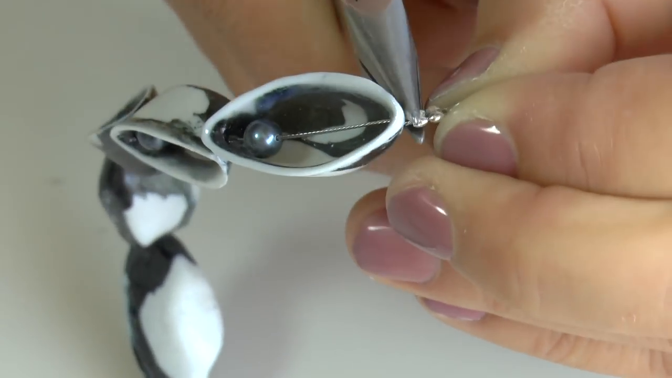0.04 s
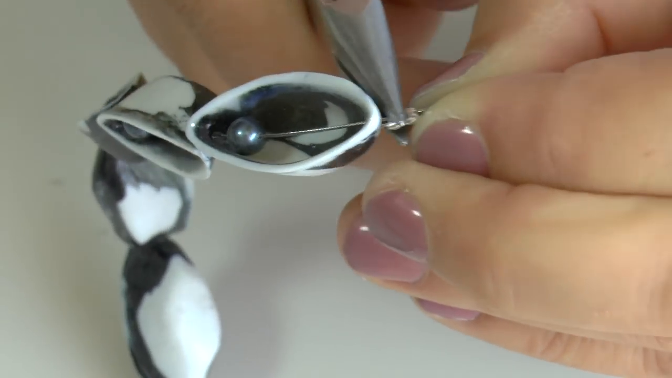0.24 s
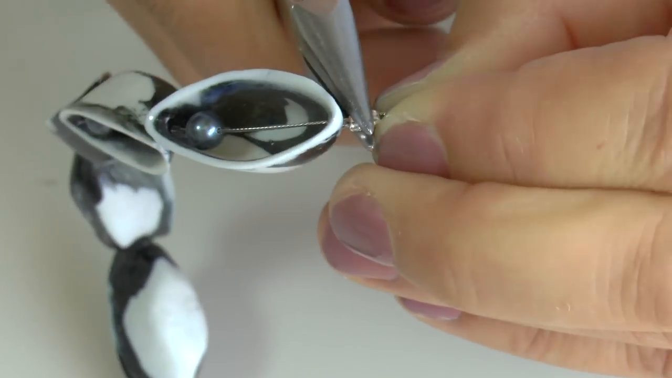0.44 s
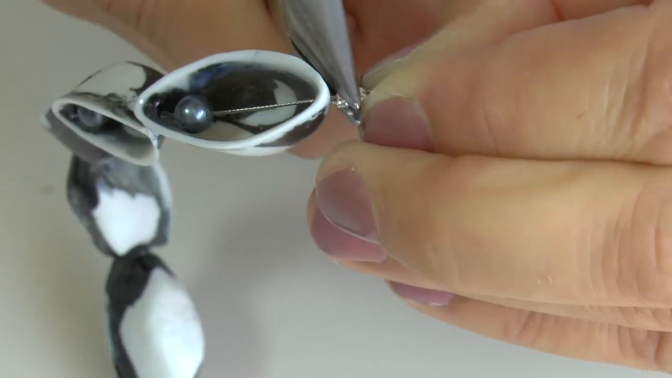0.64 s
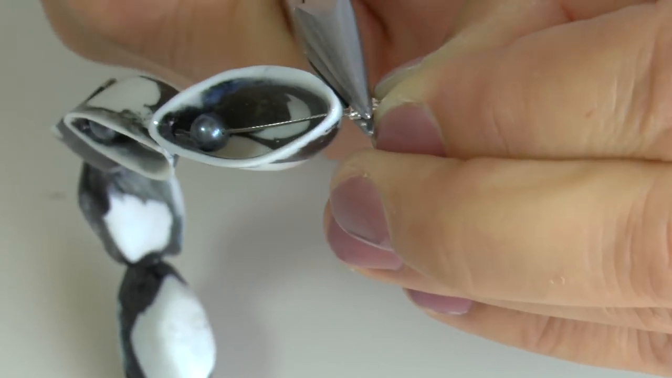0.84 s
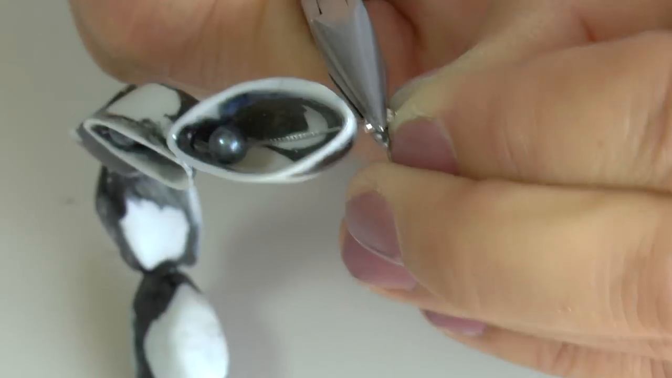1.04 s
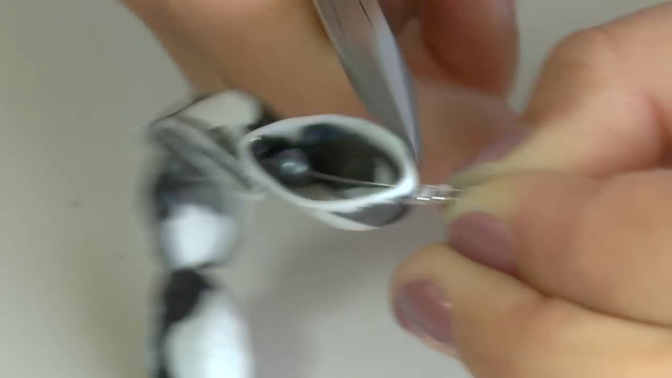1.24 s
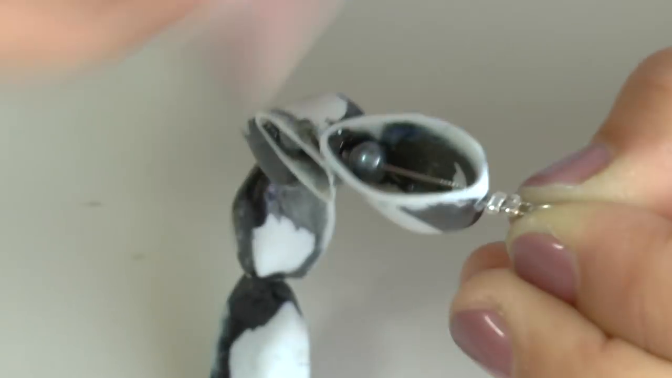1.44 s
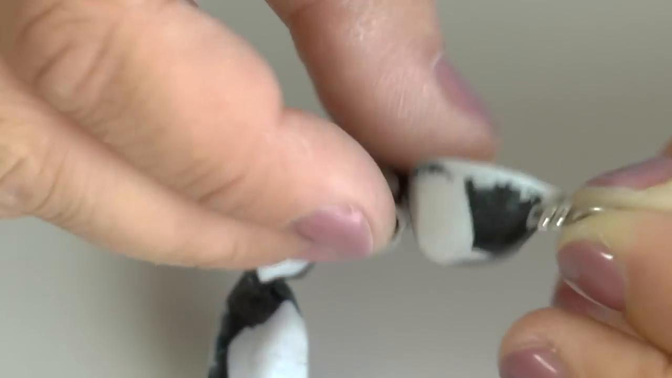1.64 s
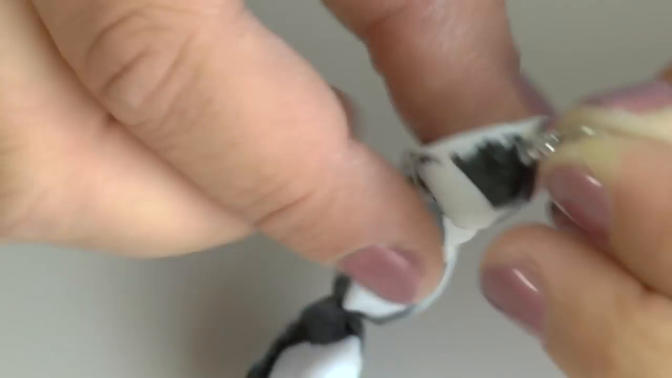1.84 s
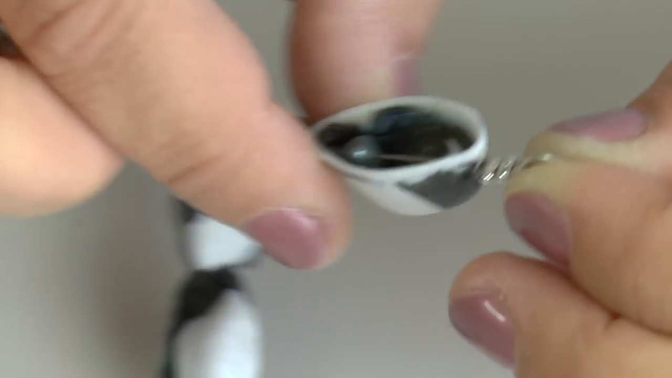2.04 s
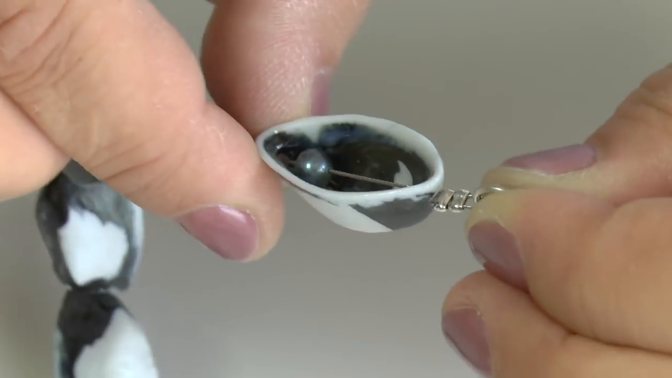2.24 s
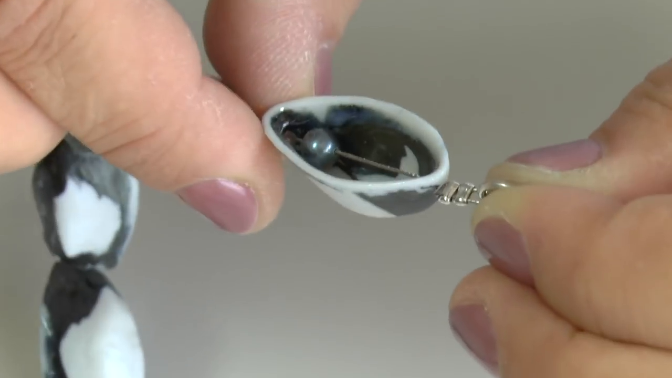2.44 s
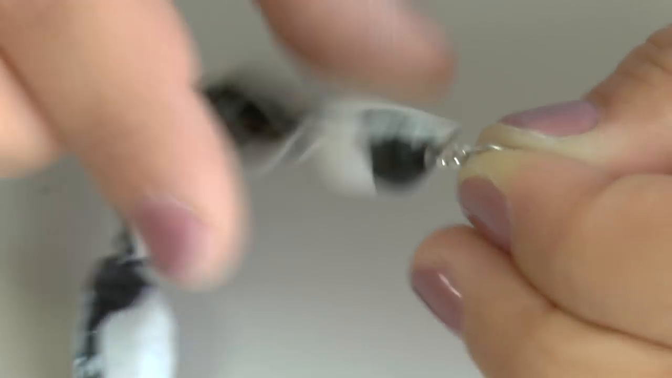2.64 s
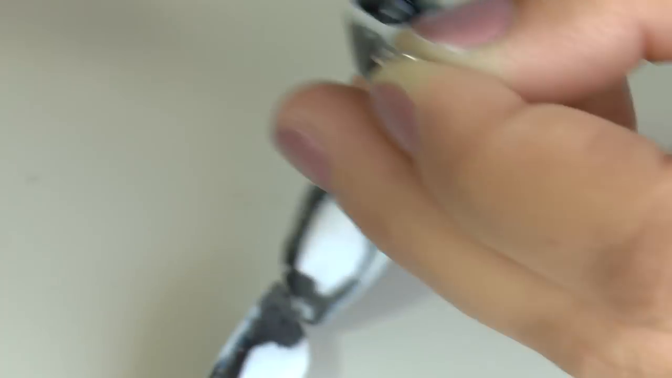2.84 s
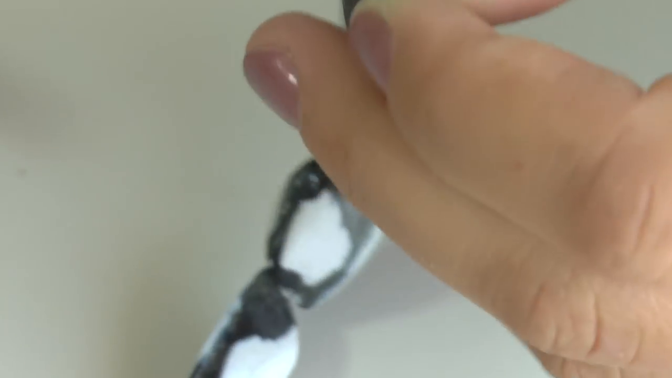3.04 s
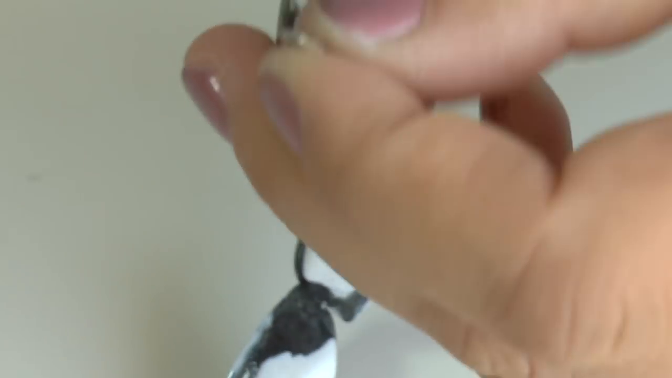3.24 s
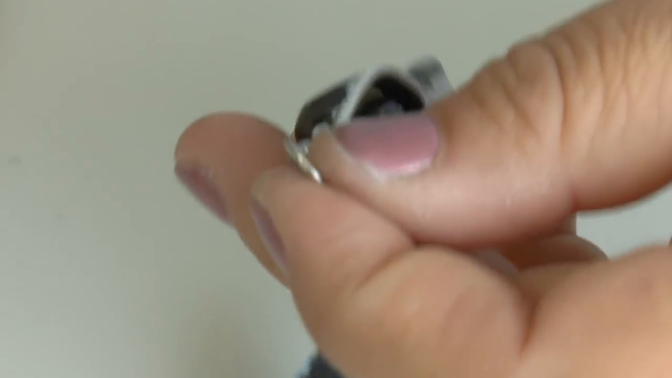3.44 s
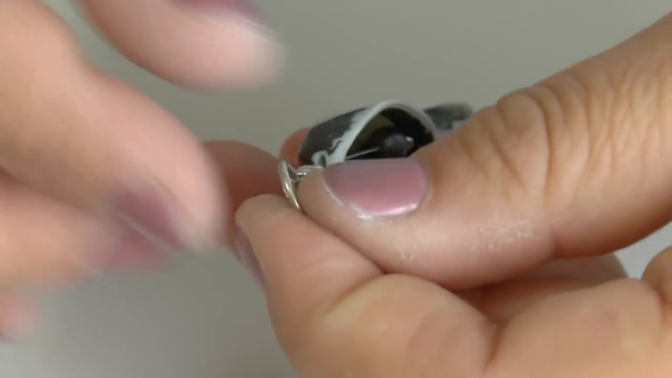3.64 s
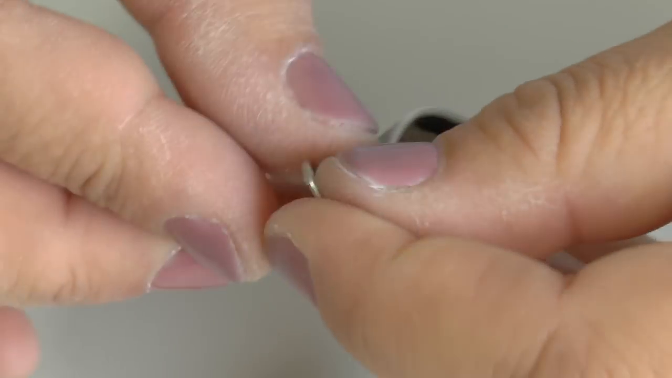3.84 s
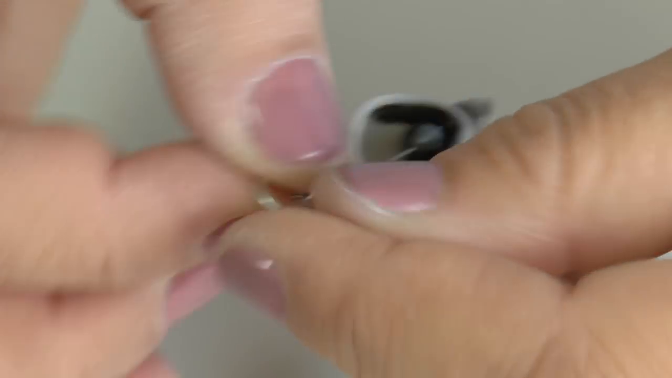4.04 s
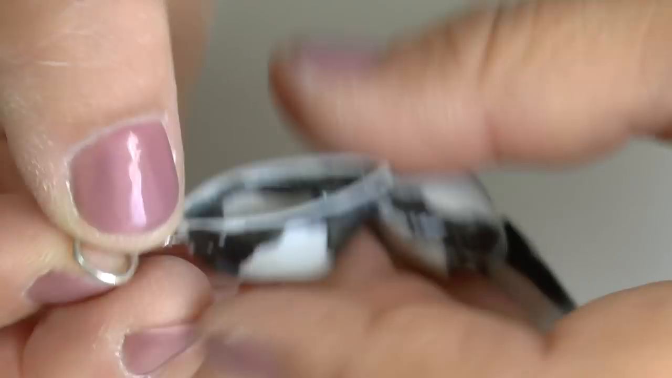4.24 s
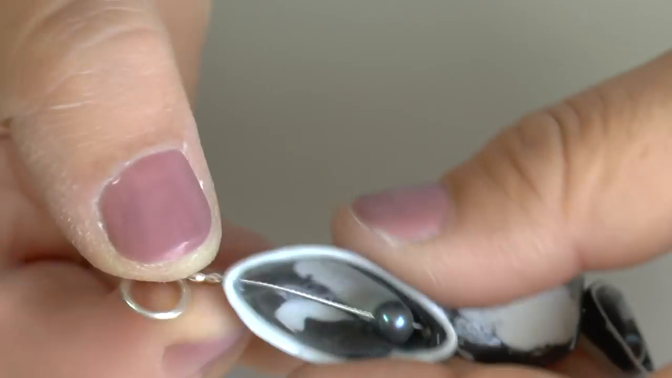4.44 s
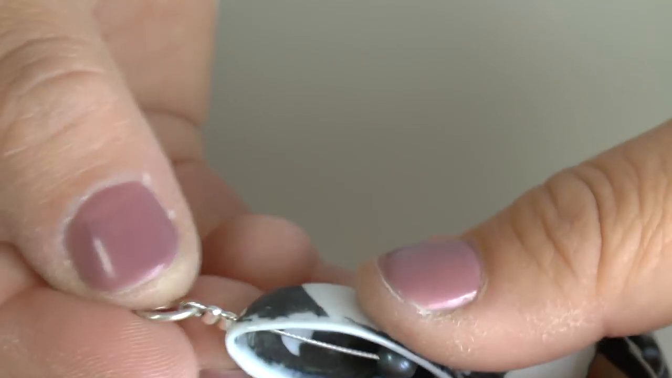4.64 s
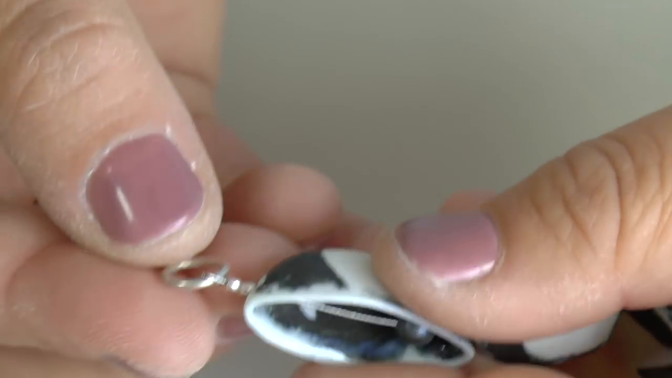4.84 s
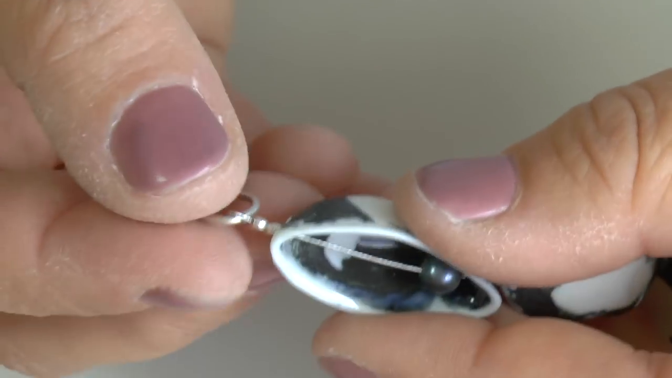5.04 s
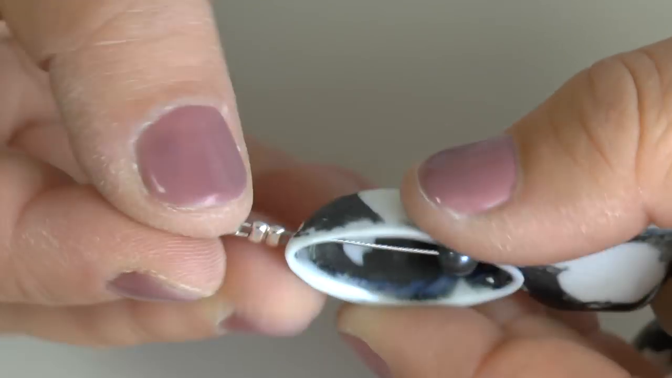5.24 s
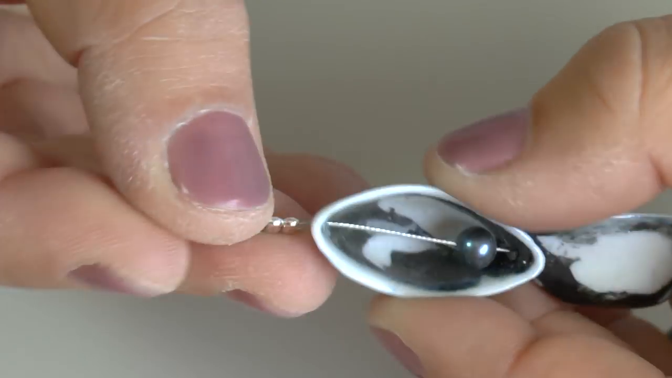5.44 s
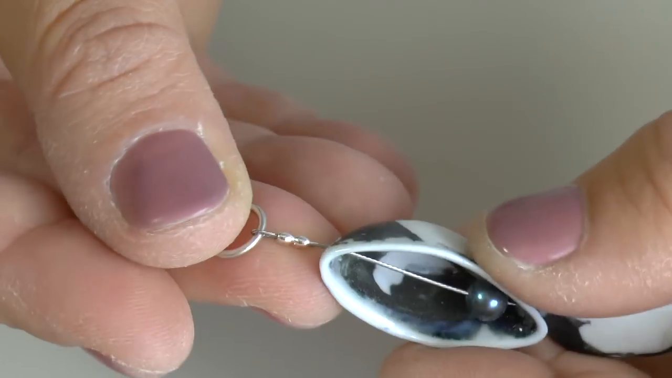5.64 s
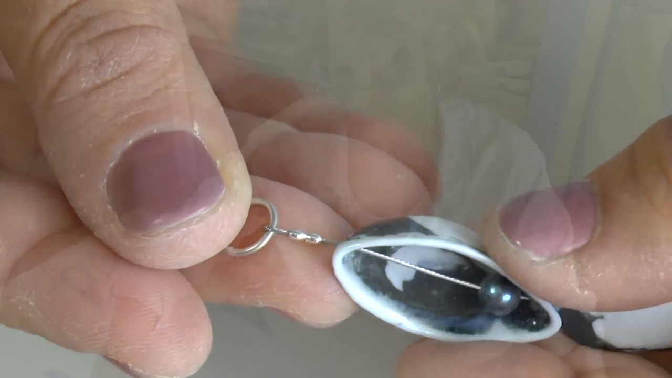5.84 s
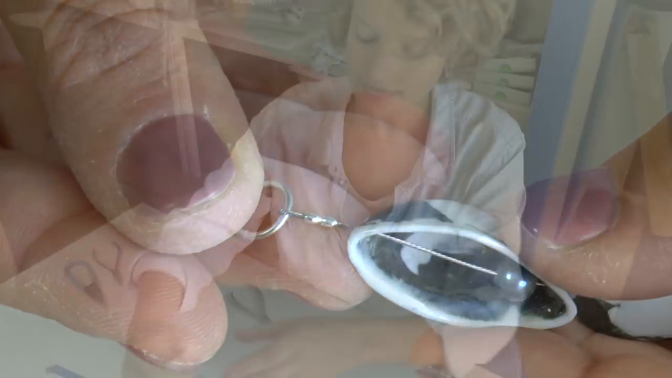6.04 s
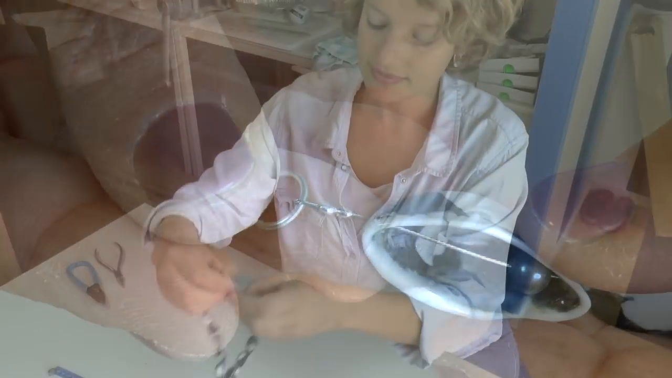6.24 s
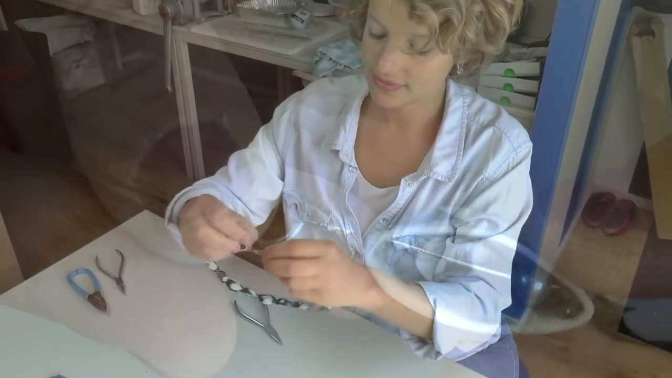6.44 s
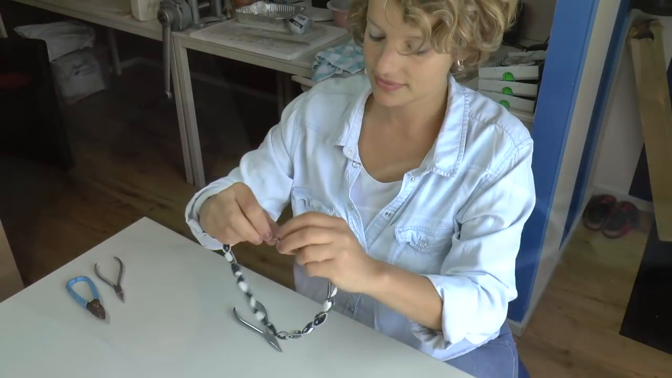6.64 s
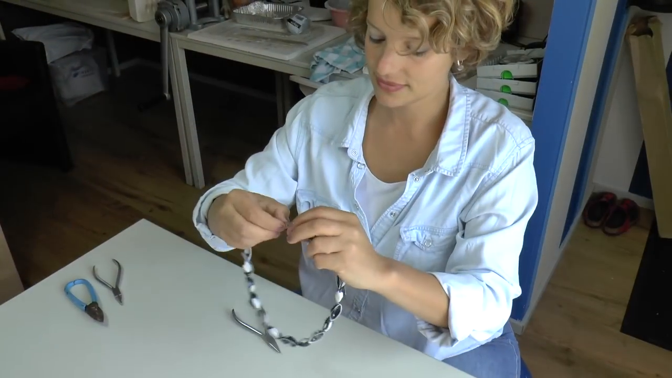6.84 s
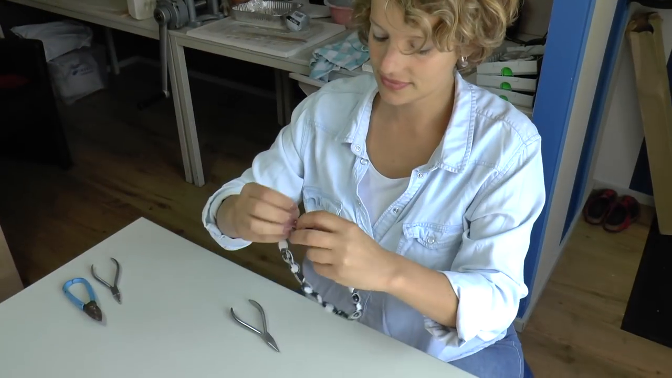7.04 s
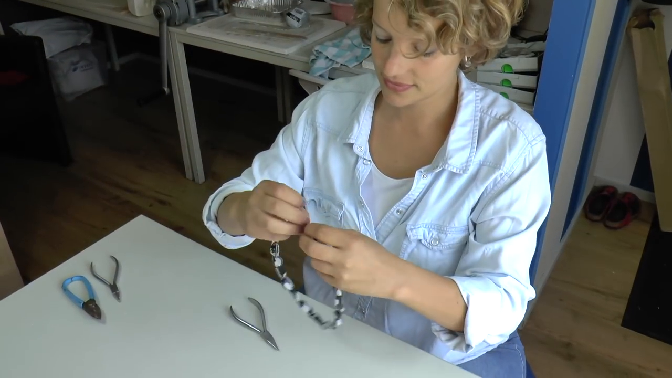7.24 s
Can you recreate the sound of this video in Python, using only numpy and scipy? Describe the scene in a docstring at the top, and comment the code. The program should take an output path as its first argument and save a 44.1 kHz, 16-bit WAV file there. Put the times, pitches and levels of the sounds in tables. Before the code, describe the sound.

A close, stereo workroom scene with low rumble, soft hiss and a faint thin whine. For the first second there are only dull, soft table bumps and barely audible ticks. At 1.3 s a sharp metal click comes with a hollow bead scrape; around 1.65-1.9 s a hard, bright steel snap and a cluster of ceramic clatter follow. From 2.1 to 2.4 s lighter ticks mix with a grainy drag. At 2.7-2.8 s strong clinks and scrapes build to a very loud hollow ceramic clack at 2.94 s, and another hard knock at 3.32 s, with short room tails. Then it turns quiet: a small click and tap at 4.33 s, delicate ticks around 5.3-5.45 s, a dull tap at 5.76 s. From 6.1 s the strand jingles and rustles faintly in little shakes, with a low thump near 6.82 s as the rumble and hiss swell until the end at about 7.4 s.

```python
"""Live workroom, heard close up: hands turn a necklace of hollow ceramic beads above a hard table.
Small metal touches tick (noise clicks, steel modes when hard) and jingle (dense filtered grains).
Beads knock and drag: blows and slips excite ceramic modes. The table bumps dully: damped partials.
Rumble, hiss (random spectra) and thin wavering tones lie below, weaker mid-scene; a sparse-tap room adds tails."""
import sys
import numpy as np
from scipy import signal
from scipy.io import wavfile
from scipy.ndimage import uniform_filter1d

SR = 44100
rng = np.random.default_rng(int(sys.argv[2]) if len(sys.argv) > 2 else 0)


def persist_wave(psi):
    """Save psi, clipped to +-1, as 16-bit WAV."""
    counts = np.round(np.clip(psi, -1, 1) * 32767).astype(np.int16)
    wavfile.write(sys.argv[1], SR, np.atleast_2d(counts).T)


N = 321930  # samples

# room background: t/s, rumble/relative dB, hiss/relative dB
BACKGROUND = [(0.0, -50, -46.5), (0.45, -44.5, -46), (1.0, -50, -47), (1.75, -42.5, -40),
              (2.0, -51.5, -46.5), (2.85, -45, -47), (2.95, -39, -65), (3.11, -53, -53),
              (3.41, -59.5, -53.5), (3.85, -57.5, -57), (4.4, -61.5, -55.5), (4.8, -52.5, -57.5),
              (4.95, -57.5, -58.5), (5.5, -60, -56), (6.1, -52.5, -54), (6.45, -51.5, -48.5),
              (6.73, -46, -44), (6.88, -36, -43.5), (7.03, -48.5, -49.5), (7.3, -44.5, -45)]
# rumble spectrum, shape only: f/Hz, density/relative dB
RUMBLE_SHAPE = [(15, -47.5), (25, -4.5), (55, -3), (107, -8), (217, -3.5), (345, -3), (487, -7.5),
                (719, -16), (900, -18.5), (1170, -65), (1980, -120)]
# hiss spectrum, shape only: f/Hz, density/relative dB
HISS_SHAPE = [(260, -33), (450, -21), (658, -19), (718, -10.5), (991, -12), (1430, -8), (1540, -3.5),
              (1800, -3.5), (2840, -4), (3240, -8), (8250, -22), (11400, -18.5), (14800, -31)]
# left-right correlation of the background: f/Hz, likeness/0-1
LIKENESS = [(60, 0.65), (150, 0.82), (380, 0.08), (950, 0.89), (2380, 1), (5980, 1), (15000, 0.99)]
# thin wavering tones: f/Hz, width/Hz, level/dB against the hiss setting
TONES = [(60, 7.2, -15.5), (710, 4.5, -14), (3470, 44, -16.5)]
# dull bumps through the table: t/s, blow/relative dB, f/Hz, t60/s (10 ms at least), overtones/dB
TABLE_BUMPS = [(.013, -22.5, 180, 0.015, -4), (.532, -21, 202, 0.024, -17),
               (1.042, -22.5, 272, 0.043, -12.5), (2.937, -29, 192.2, 0.23, -0.5),
               (3.3245, -24, 60, 0.0078, 1.5), (3.489, -48.5, 402, 0.044, 14.5),
               (5.7585, -29, 262, 0.027, -1), (6.818, -28, 140.7, 0.13, -18),
               (6.822, -25.5, 265.4, 0.09, -5), (6.823, -29, 701, 0.11, -15), (6.93, -40, 60, .15, -25)]
# room decay: f/Hz, t60/s
ROOM_DECAY = [(60, 0.2), (200, 0.62), (530, 0.52), (1390, 0.49), (3680, 0.49), (9700, 0.24)]
# room tail, side against mid: f/Hz, level/dB
ROOM_WIDTH = [(200, -9), (500, -6), (1200, -9), (2500, -11), (5000, -19.5), (9000, -8.5), (14000, -25.5)]
# small metal parts and plier steel touching: t/s, peak/dB, centre f/Hz, room send/dB
METAL_TICKS = [(0.088, -27.5, 5060, -7), (0.6105, -35, 7600, 5), (1.2886, -9, 8060, -4.5),
               (1.3124, -20, 9100, -4.5), (1.371, -23, 7000, -5), (1.3762, -22.5, 7400, -12),
               (1.6415, -22.5, 7000, 4.5), (1.6506, -14.5, 9500, -7), (1.6745, 0.5, 7760, -5),
               (1.681, -8.5, 11000, -18), (1.7785, -15, 11300, -20), (1.864, -22.5, 8950, -15),
               (1.9844, -30.5, 7500, 3.5), (2.1, -23, 13400, -13), (2.192, -23, 4850, 4),
               (2.1987, -20.5, 7600, 0), (2.2134, -29, 4740, -12), (2.231, -19, 5240, 0),
               (2.258, -17, 4960, -10), (2.4036, -28, 6460, -1), (2.412, -31.5, 9500, -10),
               (2.6192, -30, 9900, 0), (2.6376, -21.5, 7040, -5), (2.669, -27, 8560, 3),
               (2.6976, -16, 5060, 1.5), (2.7067, 1.5, 13100, -6), (2.82, -3, 3800, 2),
               (3.2593, -29.5, 7400, -0.5), (3.323, -9.5, 6000, -28), (3.8757, -45.5, 7450, 1.5),
               (3.9185, -48, 7700, -11.5), (4.1876, -40.5, 7270, 0), (4.2178, -39, 4500, -8),
               (4.3324, -21, 4460, -1.5), (4.3994, -36.5, 8440, 2), (4.511, -40, 10300, -7),
               (4.559, -27.5, 8000, -6), (4.641, -36.5, 8100, -3), (4.651, -38, 4750, -10),
               (4.662, -38, 6800, -16), (5.126, -35.5, 9000, -4), (5.28, -30.5, 6270, -4),
               (5.2982, -39, 5600, -9), (5.315, -34, 5960, -7), (5.349, -29, 6750, -3),
               (5.37, -25, 6740, -15), (5.419, -22, 6700, -7), (5.428, -31, 7300, -6),
               (5.466, -42, 6800, -10), (5.586, -32.5, 6500, -4), (5.6371, -44, 6300, -9),
               (5.6496, -39, 6500, -7), (5.676, -39, 5450, -2), (5.7668, -36, 6800, -5),
               (5.804, -43, 6500, -13), (6.2068, -29, 4800, -7), (6.213, -30, 4800, -5),
               (6.3612, -30, 5200, -17), (6.5226, -24.5, 7500, -5), (6.645, -29, 4850, -10),
               (6.6925, -28.5, 5240, -12), (6.7545, -42, 6630, -7), (6.9262, -28, 6350, -17),
               (7.0853, -34, 4800, -5), (7.193, -28, 6300, -1)]
# steel resonances: f/Hz, width/Hz, level/relative dB
STEEL_MODES = [(4800, 350, -6), (5400, 450, -8), (7080, 500, 0), (7550, 400, -3), (9550, 350, -4),
               (10700, 500, -6), (13720, 300, 3), (15150, 200, -1)]
# beads knocking each other or the table: t/s, peak/dB, tilt above 2 kHz/dB per octave, hollow/dB, room send/dB
BEAD_KNOCKS = [(0.7377, -33.5, 2.5, -8, 2), (1.3564, -23, 0, 11, 9.5), (1.6932, -15.5, 3, -5, 3),
               (1.7, -14.5, 4, -7, 0.5), (1.7828, -14, 4, -19, 7.5), (1.79, -18, 3, -10, -1),
               (1.8629, -16.5, -0.5, -6, 7.5), (2.0798, -26, -3.5, 3, 8), (2.0996, -21.5, -8, -6, 1),
               (2.1675, -25, 2, 0, 2), (2.2564, -24, -20, 5, 10), (2.2822, -19, 10.5, -20, 0),
               (2.7263, -9.5, 5.5, 0, 6.5), (2.7915, -7.5, 4.5, -9, 10.5), (2.821, -8, 5, -8, -4),
               (2.9372, 1.5, 1.5, 9, 1.5), (3.3054, -29, -18, -9, 10), (3.3239, -2.5, 1, 1.5, 4),
               (3.4894, -23.5, -7.5, -5, 6.5), (4.3326, -22.5, -2.5, 0.5, -4.5), (5.3477, -33, 11, -1, 6),
               (5.5807, -38, 6, 9, 8), (5.7578, -23.5, -13, -3, -2)]
# broad colour of ceramic contact: f/Hz, level/dB
CONTACT_COLOUR = [(88, -31), (150, -10), (494, -10.5), (566, -8), (854, -3), (941, -12.5), (2140, -0.5),
                  (2310, 3), (11300, -19.5), (14800, -33), (16000, -52.5)]
# beads and table top resonating: f/Hz, width/Hz, weight/relative dB
BEAD_MODES = [(572, 36, 9), (740, 45, -3), (1453, 200, 7.5), (2540, 44, -5), (2757, 71, 0.5),
              (3050, 170, -1.5), (3870, 290, -7.5), (4640, 69, 0.5)]
# air in the boat-shaped beads: f/Hz, width/Hz, weight/relative dB
HOLLOW_MODES = [(1820, 140, 4), (2130, 55, 3)]
# stiff bead walls, rung by a blow: f/Hz, width/Hz, weight/relative dB
WALL_MODES = [(2330, 330, 10), (3980, 420, 11)]
# strand drawn over the table: peak t/s, pressure/relative dB, rise/s, fall/s, treble/(1.92 dB), hollow/dB
DRAG_STROKES = [(1.366, -28.5, 0.022, 0.11, -1.5, 11.5), (1.65, -38.5, 0.054, 0.11, 1, -11),
                (1.698, -30, .008, 0.052, 3.5, 7), (1.79, -31.5, 0.012, 0.06, 2, 3),
                (1.87, -23.5, 0.05, 0.1, -1, 6.5), (2.082, -45.5, 0.0037, 0.32, 1.5, 20),
                (2.25, -21, 0.13, 0.12, -0.9, 0), (2.4, -36, 0.091, 0.71, -15, -24),
                (2.68, -35.5, 0.039, 0.14, 1, -15), (2.73, -27, .008, 0.15, 1, 2),
                (2.827, -15.5, .035, 0.082, 0.5, -1), (2.94, -23, 0.0047, 0.016, -0.7, -22),
                (2.96, -34.5, .02, 0.18, 3.5, 14), (4.19, -45, 0.038, 0.38, -1.5, 0.5),
                (4.301, -48.5, 0.11, .02, -2.5, 5), (4.339, -33, 0.015, 0.079, -2, 7),
                (4.48, -45.5, 0.021, 0.12, -2.5, 14.5), (4.74, -44, 0.18, 0.24, -3, -13),
                (4.9, -46.5, 0.16, 0.069, -4, -17), (5.27, -51, .004, 0.085, 1.2, 11),
                (5.351, -49.5, 0.0067, 0.052, 4.5, -17), (5.583, -44.5, 0.013, 0.099, -6, 14),
                (5.76, -36, .002, 0.018, -20, -14), (6.088, -33.5, 0.16, 0.13, 1.5, 2.5),
                (6.52, -48, 0.26, 0.15, -21, 4), (6.7, -41, .06, 0.6, 1.5, -14),
                (6.83, -52, 0.26, 0.18, 2, 2.2), (7.3, -40, 0.37, .2, -0.8, -2.2)]
# strand lifted and shaken: peak t/s, level/relative dB, rise/s, fall/s
STRAND_SHAKES = [(6.11, -44, 0.21, 0.42), (6.211, -32.5, 0.0091, 0.08), (6.28, -49.5, .05, 0.33),
                 (6.356, -40.5, 0.017, 0.16), (6.53, -35, 0.06, 0.21), (6.644, -43.5, 0.013, 0.31),
                 (6.756, -40, .012, 0.11), (6.932, -35.5, 0.013, 0.021), (6.95, -48, .02, 0.29),
                 (7.096, -36.5, .026, 0.043), (7.13, -51, 0.043, .23)]
# colour of the jingling parts: f/Hz, level/relative dB
JINGLE_COLOUR = [(2060, -30.5), (3500, -2.5), (6090, 1), (7560, 4.5), (8630, 0.5), (11300, -9.5),
                 (14200, -8), (15600, -21), (16000, -26)]
# table reflection and housing: f/Hz, width/Hz, gain/dB
COLOUR_NOTCHES = [(483.6, 62, -9), (932, 69, -7.5), (1297, 41, -8.5), (1532, 45, -16), (2005, 13, -6),
                  (2455, 78, -5), (3800, 300, 0), (8350, 640, -3)]
# level dips just ahead of the two hardest knocks: start/s, end/s, gain/dB
LEVEL_DIPS = [(2.92, 2.9365, -16), (3.307, 3.323, -11)]

EDGE_HZ = 16500
SWELL_DB = 20  # range covered in one rise or fall time
CONTROL_STEP = 32  # samples per control value
# a harder tick is broader, and a larger share of it is ringing steel
BREADTH_OCT_AT_0DB, BREADTH_OCT_PER_DB, BREADTH_MIN_OCT = 1.15, 0.04, 0.49
RING_SHARE_AT_0DB, RING_SHARE_PER_DB = 0.59, 0.1


def gain_of(db):
    """Amplitude ratio of a level in dB."""
    return 10 ** (np.asarray(db) / 20)


def evened(x):
    """Scale to unit RMS."""
    return x / np.sqrt(np.mean(x ** 2) + 1e-20)


def read(points, hz):
    """Interpolate a curve over log frequency."""
    f_hz, value = np.transpose(points)
    return np.interp(np.log(hz + 1), np.log(f_hz + 1), value)


def add(mix, s, sound):
    """Add a sound into mix at s seconds, cut at the end."""
    part = mix[round(s * SR):][:len(sound)]
    part += sound[:len(part)]


def causal(db, size=4096):
    """Minimum-phase impulse for a gain in dB on size / 2 + 1 frequencies."""
    log_gain = np.log(gain_of(np.maximum(np.r_[db, db[-2:0:-1]], -100)))
    spectrum = np.exp(np.conj(signal.hilbert(log_gain)))
    return np.fft.ifft(spectrum).real[:size // 2]


def filled(gain):
    """Interpolate a control to every sample."""
    return np.interp(np.arange(N) / CONTROL_STEP, np.arange(len(gain)), gain)


def swell(s, db, rise_s, fall_s):
    """Control gain peaking at s, rising and falling linearly in dB."""
    t = np.arange(N // CONTROL_STEP + 2) * CONTROL_STEP / SR - s
    away = np.where(t < 0, -t / max(rise_s, .002), t / max(fall_s, .002))
    return gain_of(db - SWELL_DB * away)


def grains(per_s, spread_db):
    """Random tiny impacts of either sign; spread_db scales an exponential spread of their levels."""
    size = gain_of(spread_db * np.minimum(rng.exponential(1, N), 4))
    return rng.standard_normal(N) * (rng.random(N) < per_s / SR) * size


def lifted(modes, hz, db):
    """Lift in dB that a set of resonances gives a spectrum."""
    peaks = sum(gain_of(d) / (1 + (2 * (hz - f) / abs(w)) ** 2) for f, w, d in modes)
    return 20 * np.log10(1 + gain_of(db) * peaks)


def air():
    """Rumble and hiss: random short-time spectra with drifting patches, plus the thin tones."""
    hop, window = 256, 1024  # samples
    frames, hz = N // hop + 5, np.fft.rfftfreq(window, 1 / SR)
    a, b, c, d, patches = rng.standard_normal((frames, 513, 5)).T
    patches = uniform_filter1d(uniform_filter1d(patches, 10, 0), 12, 1)
    patch_gain = gain_of(2.38 * evened(patches))
    s, rumble_db, hiss_db = np.transpose(BACKGROUND)
    t = np.arange(frames) * hop / SR
    low, high = gain_of(read(RUMBLE_SHAPE, hz)), gain_of(read(HISS_SHAPE, hz))
    rumble = np.outer(low / np.linalg.norm(low), gain_of(np.interp(t, s, rumble_db)))
    hiss = np.outer(high / np.linalg.norm(high), gain_of(np.interp(t, s, hiss_db)))
    same = np.clip(read(LIKENESS, hz), -1, 1)[:, None]
    left = a + 1j * b
    right = same * left + np.sqrt(1 - same ** 2) * (c + 1j * d)
    spectra = np.array([left, right]) * np.hypot(rumble, hiss) * patch_gain
    wash = signal.istft(spectra, nperseg=window, noverlap=window - hop)[1][:, :N]
    return wash + whines(np.interp(np.arange(N) / SR, s, hiss_db))


def whines(level_db):
    """Each tone is a steady line blurred by a narrow band of noise."""
    out, t = np.zeros(N), np.arange(N) / SR
    for hz, width_hz, db in TONES:
        noise = rng.standard_normal((N // CONTROL_STEP + 2, 2)) @ [1, 1j]
        pole = np.exp(-np.pi * abs(width_hz) * CONTROL_STEP / SR)
        waver = signal.lfilter([1], [1, -pole], noise)
        line = filled(waver / np.std(waver)) + 1.9  # 1.9: the steady part
        out += gain_of(db) * evened((line * np.exp(2j * np.pi * hz * t)).real)
    return out * gain_of(level_db)


def bumps():
    """A low push with two overtones of the table top, quickly damped."""
    out, t = np.zeros(N), np.arange(8000) / SR
    for s, db, hz, t60_s, over_db in TABLE_BUMPS:
        over = gain_of(over_db)
        partials = ((1, 0.93), (1.4, over), (2.7, over))  # frequency ratio, gain
        push = sum(g * np.sin(2 * np.pi * hz * k * t) for k, g in partials)
        decay = gain_of(db - 60 * t / max(t60_s, .01))
        add(out, s, decay * push * (1 - np.exp(-t / 0.00077)))
    return out


def room(x):
    """Sparse random-sign taps, each band with its own decay; mid and side form the stereo tail."""
    taps = np.zeros((2, SR))
    at = np.arange(120, SR - 20, 20) + rng.integers(0, 20, (2, (SR - 121) // 20))
    np.put_along_axis(taps, at, rng.choice([-1., 1.], at.shape), 1)
    hz, t, z = signal.stft(taps, SR, nperseg=256)
    decay = gain_of(-60 * t / read(ROOM_DECAY, hz)[:, None])
    width = gain_of([0 * hz, read(ROOM_WIDTH, hz)])[:, :, None]
    mid, side = signal.istft(z * decay * width, SR, nperseg=256)[1]
    tail = np.array([mid + side, mid - side]) / np.linalg.norm(mid)
    return signal.fftconvolve(x[None], tail, axes=1)[:, :N]


def ticks(chatter_s=.0011):
    """Each touch chatters in a noise click around its centre; hard ones also ring nearby steel modes."""
    dry, wet = np.zeros(N), np.zeros(N)
    t, hz = np.arange(2000) / SR, np.fft.rfftfreq(512, 1 / SR)
    click_t = t[:500]
    chatter_env = np.exp(-click_t / chatter_s) * np.minimum(click_t / .0005, 1)
    luck = rng.standard_normal((len(METAL_TICKS), 500))
    for (s, db, centre_hz, room_db), chance in zip(METAL_TICKS, luck):
        octaves = max(BREADTH_OCT_AT_0DB + BREADTH_OCT_PER_DB * db, BREADTH_MIN_OCT)

        def near_db(f):
            return -6 * (np.log2(f / centre_hz + 0.0013) / octaves) ** 2

        ring = sum(gain_of(d + near_db(f)) * np.exp(-np.pi * abs(w) * t) * np.sin(2 * np.pi * f * t)
                   for f, w, d in STEEL_MODES)
        ring *= np.minimum(t / .001, 1)  # builds up over the contact
        click = np.convolve(causal(near_db(hz), size=512), chance * chatter_env)
        share = np.clip(RING_SHARE_AT_0DB + RING_SHARE_PER_DB * db, 0, 1)
        sound = share * ring / np.linalg.norm(ring)
        add(sound, 0, (1 - share) * click / np.linalg.norm(click))
        sound *= gain_of(db) / abs(sound).max()
        add(dry, s, sound)
        add(wet, s, gain_of(room_db) * sound)
    return dry, wet


def ceramic(tilt_db, hollow_db, clack_db=-60, modes_db=-2.0):
    """Impulse of a bead contact: broad colour lifted at the modes, tilted above 2 kHz by hardness."""
    hz = np.fft.rfftfreq(4096, 1 / SR)
    colour_db = read(CONTACT_COLOUR, hz) + lifted(BEAD_MODES, hz, modes_db)
    colour_db += lifted(HOLLOW_MODES, hz, hollow_db) + lifted(WALL_MODES, hz, clack_db)
    return causal(colour_db + tilt_db * np.log2(np.maximum(hz / 2000, 1)))


def knocks():
    """One sharp blow and a faint rattle after it excite the ceramic."""
    dry, wet, t = np.zeros(N), np.zeros(N), np.arange(600) / SR
    luck = rng.standard_normal((len(BEAD_KNOCKS), 600))
    for (s, db, tilt_db, hollow_db, room_db), rattle in zip(BEAD_KNOCKS, luck):
        blow = (t == 0) + .08 * rattle * np.exp(-t / .002)
        sound = np.convolve(ceramic(tilt_db, hollow_db, 0), blow)
        sound[:30] *= np.linspace(.3, 1, num=30)  # the contact takes a moment to load
        spread = ceramic(tilt_db, hollow_db, clack_db=-18.0)  # walls beam their ring: less reaches the room
        add(dry, s, sound * gain_of(db) / abs(sound).max())
        add(wet, s, spread * gain_of(db + room_db) / abs(spread).max())
    return dry, wet


def drag():
    """Dense slips excite the ceramic; harder contact is brighter, and a bead lying open rings hollow."""
    slips = grains(per_s=6000., spread_db=1.5)
    hard = signal.oaconvolve(slips, ceramic(0, -40))[:N]
    hollow = signal.oaconvolve(slips, ceramic(0, 0))[:N] - hard
    body = signal.sosfilt(signal.butter(2, 2700., fs=SR, output="sos"), hard)
    treble = hard - body
    level = bright = ring = 0
    for *stroke, tilt_db, hollow_db in DRAG_STROKES:
        pressure = swell(*stroke)
        level = level + pressure
        bright = bright + pressure * gain_of(1.92 * tilt_db)
        ring = ring + pressure * gain_of(hollow_db)
    rub = filled(level) * body + filled(bright) * treble + filled(ring) * hollow
    return rub / np.sqrt(np.mean(body ** 2))


def rustle():
    """A shower of faint metal touches, too dense to hear one by one, swelling at each shake."""
    colour = causal(read(JINGLE_COLOUR, np.fft.rfftfreq(512, 1 / SR)), size=512)
    shower = signal.oaconvolve(grains(per_s=6000., spread_db=-2.0), colour)[:N]
    return evened(shower) * filled(sum(swell(*shake) for shake in STRAND_SHAKES))


def scene():
    """Near sounds direct, their sends through the room, and the background."""
    tick, tick_wet = ticks()
    knock, knock_wet = knocks()
    bump, rub, jingle = bumps(), drag(), rustle()
    near = tick + knock + bump + gain_of(-7.5) * rub + gain_of(-2) * jingle
    send = tick_wet + knock_wet + gain_of(-7.0) * bump + gain_of(-12.0) * rub + gain_of(-10.5) * jingle
    return near + room(send) + air()


def record(dry):
    """Notches and bass cut, two brief level dips, overload clipping, then the band limit."""
    hz, t = np.fft.rfftfreq(4096, 1 / SR), np.arange(N) / SR
    colour = causal(sum(db / (1 + (2 * (hz - f) / abs(w)) ** 2) for f, w, db in COLOUR_NOTCHES))
    heard = signal.oaconvolve(dry, colour[None])[:, :N]
    heard = signal.sosfilt(signal.butter(3, 36., "high", fs=SR, output="sos"), heard)
    dip_db = sum(db * ((t > start) & (t < end)) for start, end, db in LEVEL_DIPS)
    heard = heard * gain_of(uniform_filter1d(dip_db, size=40))
    heard = np.clip(heard, -.92, .92)
    band = signal.firwin(511, EDGE_HZ, window=("kaiser", 9), fs=SR)
    return signal.oaconvolve(heard, band[None], "same")


dry = scene()
out = record(dry)
persist_wave(out)
```